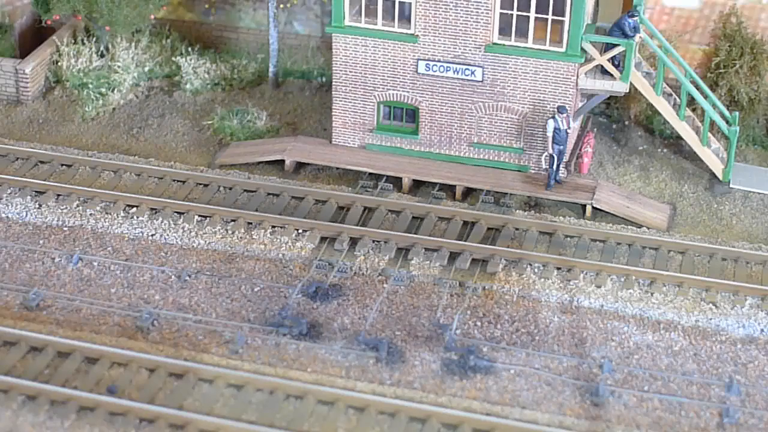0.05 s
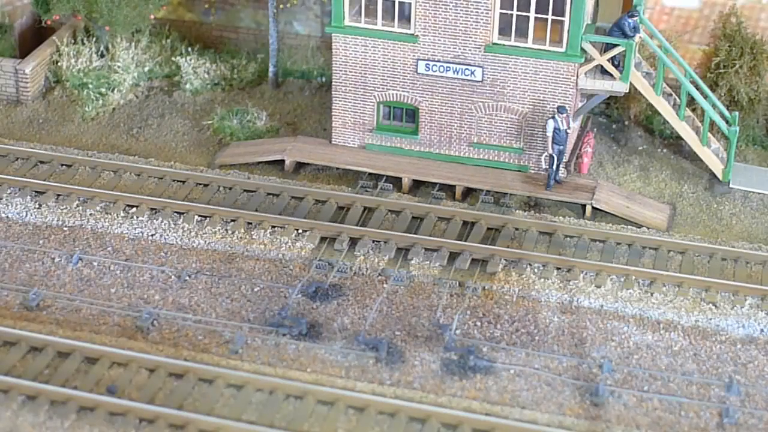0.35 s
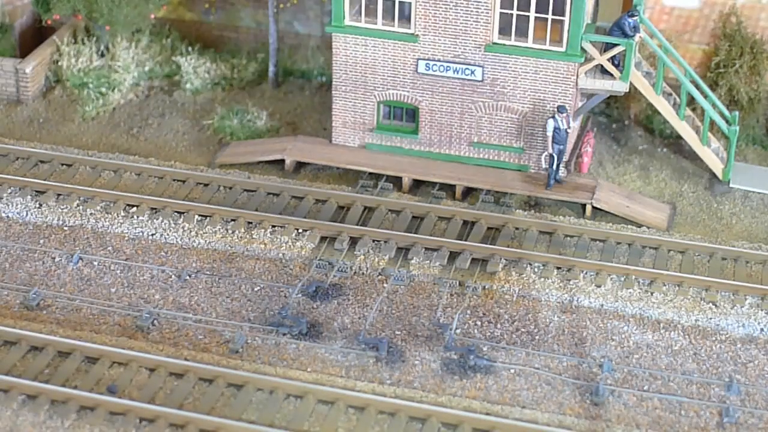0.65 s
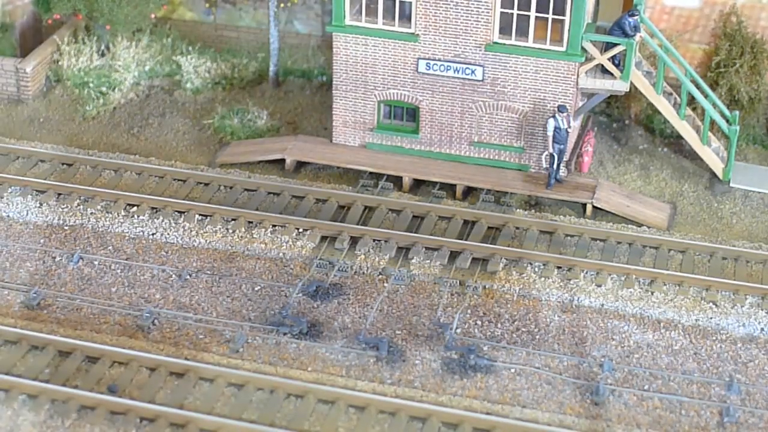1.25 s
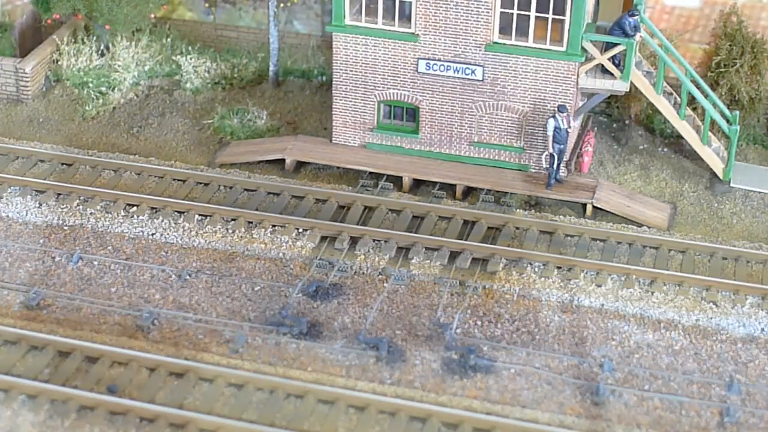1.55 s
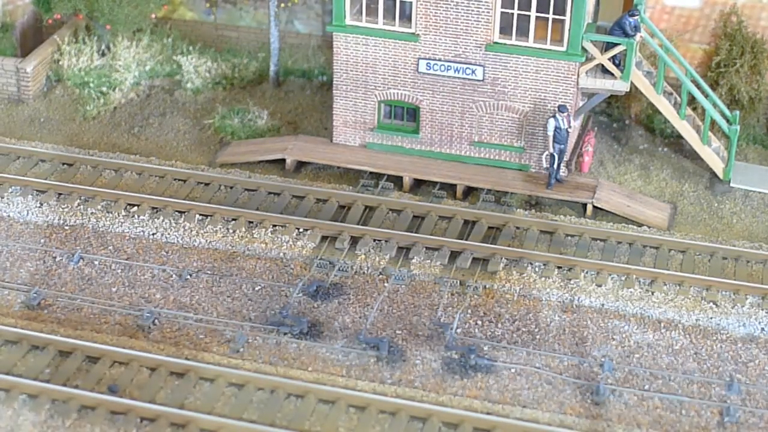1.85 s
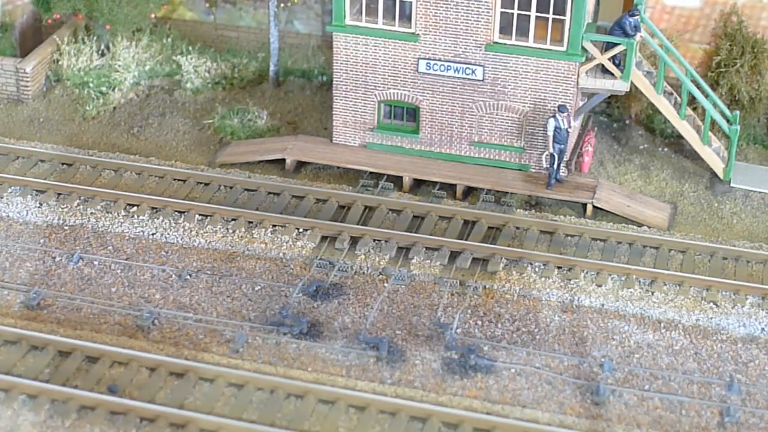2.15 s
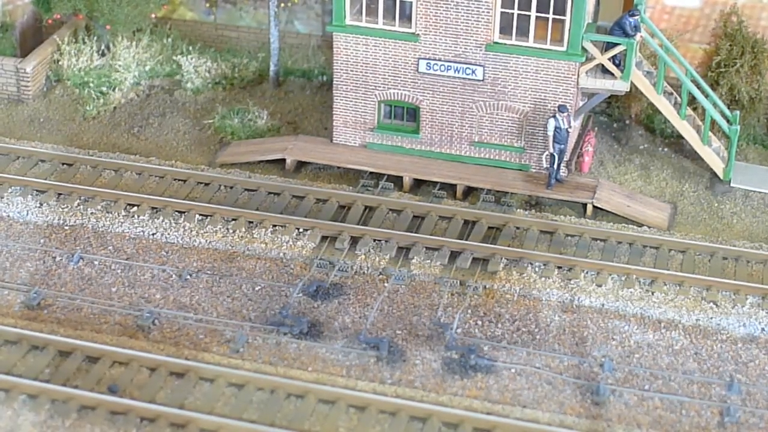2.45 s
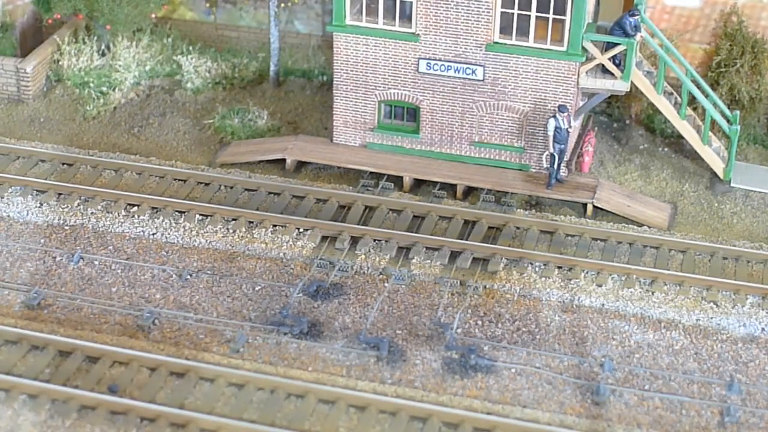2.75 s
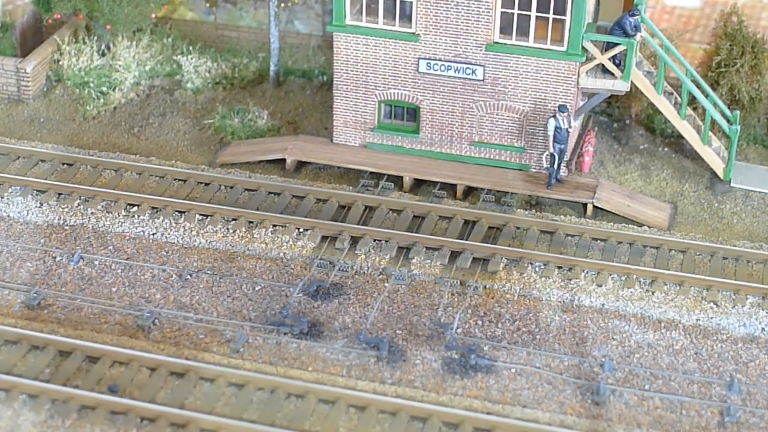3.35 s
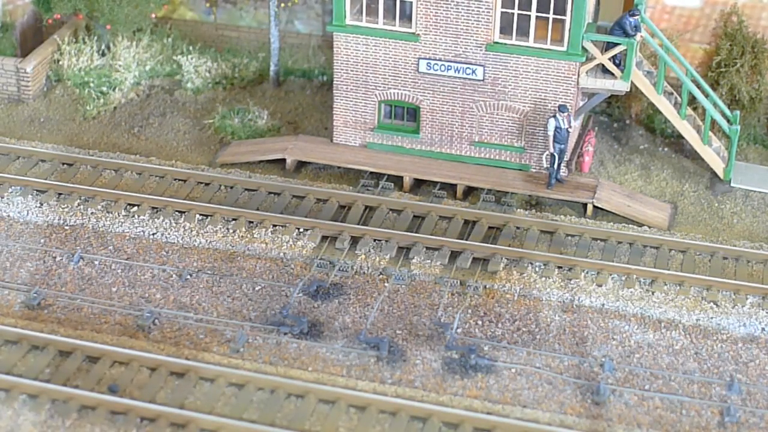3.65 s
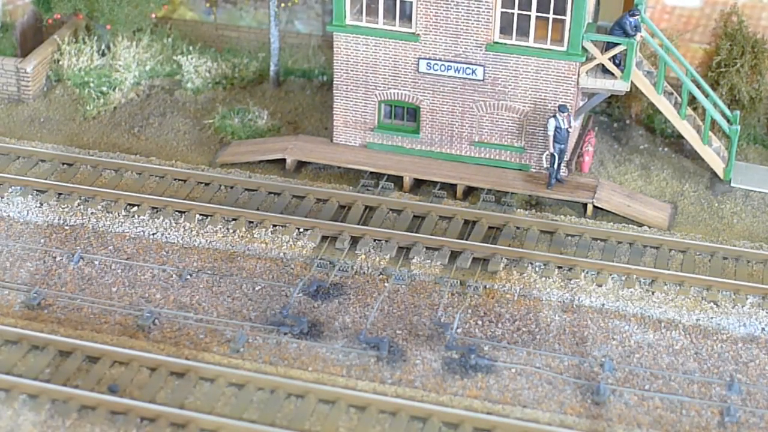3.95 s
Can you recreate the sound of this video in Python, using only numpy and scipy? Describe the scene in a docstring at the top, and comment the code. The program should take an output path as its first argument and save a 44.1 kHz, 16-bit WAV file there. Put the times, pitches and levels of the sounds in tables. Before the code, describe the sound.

A small electric motor whirrs and rattles steadily in a quiet room.

```python
"""A small electric motor, probably a model train out of sight, whirrs steadily in a quiet room.
Its gears and wheels rattle a light body that sings at a few pitches; one microphone hears the rattle
with a short room tail, over a low hum and faint rumble. The sound cuts in after a moment. Soft clicks,
tiny scrapes and low bumps follow in the first second; faint brushes and thuds come now and then."""
import sys
import numpy as np
from scipy import signal
from scipy.fft import rfft, irfft
from scipy.io import wavfile

SR = 44100
rng = np.random.default_rng(int(sys.argv[2]) if len(sys.argv) > 2 else 0)


def transcribe(u):
    """Save the signal u as a 16-bit wav file named by the first command-line argument.

    u: samples, shape (n,) or (channels, n), limited to [-1, 1]; the rate is SR.
    q: integer samples, one column per channel.
    """
    v = np.clip(np.atleast_2d(u).T, -1, 1)
    q = np.round(v * 32767).astype(np.int16)
    wavfile.write(sys.argv[1], SR, q)


N = 176400
T = np.arange(N) / SR

# how hard the mechanism rattles, before the trims: time_s, body_db, treble_db
RATTLE_DRIVE = [(0.31,-40.5,-42.5),(0.4,-39.5,-41),(0.69,-37.5,-41.5),(0.95,-39,-41),(1.35,-38,-39.5),(1.65,-38,-39.5),(1.97,-37.5,-39.5),(2.36,-36.5,-40),(2.76,-35.5,-40),(3.1,-35.5,-41),(3.6,-36.5,-39.5),(4.0,-36,-39.5)]
# colour of the rattle at the microphone: frequency_hz, relative_db
RATTLE_SPECTRUM = [(100,-33),(300,-22.5),(560,-25),(780,-20.5),(900,-14),(1040,-10),(1150,-2.5),(1320,-3.5),(1450,-8),(1650,-10),(1860,-7.5),(1990,-16),(2230,-12),(2370,-16.5),(2520,-14.5),(2650,-19.5),(2800,-10),(2950,-17),(3200,-18.5),(3370,-10),(3520,-17.5),(3750,-23.5),(4400,-23.5),(4900,-21),(5200,-27.5),(5700,-29.5),(6200,-28.5),(7250,-32.5),(7450,-43),(7600,-32),(8200,-30),(8800,-24),(9400,-32.5),(10100,-35.5),(10700,-38),(12300,-46.5),(14100,-50),(14850,-41),(15300,-48),(16000,-50)]
# where the body sings: pitch_hz, width_hz, level_db (relative to body_db)
BODY_MODES = [(939.7,8.6,-9.5),(1137,8.9,-10.5),(1196,14,-15.5),(1237,10,-19.5),(1286.3,3.9,-9),(1633,7,-15),(1684,7,-20),(1758,9.5,-14),(1885,4.4,-19),(2164,7,-23.5),(2193,9.6,-20),(2272,6,-21),(2740,7,-25),(2820,19,-22),(3310,16,-20)]
# swell shared by the lowest body mode and the shaft tone: time_s, gain_db
SINGING_SWELL = [(0.3,0.5),(1.3,-7),(1.8,0),(2.15,-7),(2.5,-1),(2.8,6.5),(3.1,0.5),(3.4,-1.5),(4,-7.5)]
# soft clicks: start_s, scuff_db, ring_db
CLICK_EVENTS = [(.49,-41,-39.5),(.621,-47.5,-60),(.757,-47.5,-60),(.878,-49,-64)]
# colour of a click's scuff: frequency_hz, relative_db
SCUFF_SPECTRUM = [(80,-22),(160,-2),(300,-3.5),(480,3),(620,-2.5),(790,5),(1100,-19),(2500,-24),(5500,-15),(7500,-28),(15000,-42)]
# the hollow part that the clicks ring: pitch_hz, relative_db, t60_s
HOLLOW_MODES = [(627,3,0.24),(803,-10,.12)]
# low bumps: start_s, pitch_hz, level_db, t60_s
BUMP_EVENTS = [(0.296,174,-41.5,.45),(0.616,183,-50,0.27)]
# thin scrapes around the first click: start_s, level_db
SCRAPE_EVENTS = [(.482,-48),(.489,-50),(.501,-51)]
# faint brushes: peak_s, sigma_s, level_db
BRUSH_EVENTS = [(.485,.022,-53),(.565,.02,-58),(0.61,0.012,-55),(.69,0.035,-58),(.762,0.014,-53),(.795,0.0087,-55),(1.213,.004,-57),(1.34,.03,-62),(1.975,.012,-57)]
# colour of the brushes: frequency_hz, relative_db
BRUSH_SPECTRUM = [(800,-17),(3000,4),(6500,0),(10000,2),(12000,-4),(14000,-4),(16000,-11)]
# soft thuds: peak_s, sigma_s, level_db
THUD_EVENTS = [(.9,0.042,-50),(2.26,.03,-56),(2.603,.025,-50)]
# colour of the thuds: frequency_hz, relative_db
THUD_SPECTRUM = [(25,-20),(45,-2),(70,-5),(105,2),(150,-6),(260,-22),(600,-43)]
# room rumble at the microphone: time_s, level_db
RUMBLE_LEVELS = [(0.3,-55.5),(0.9,-56),(1.3,-60.5),(2,-54),(2.6,-55),(3.05,-51.5),(3.6,-54),(4,-59)]
# colour of the room rumble: frequency_hz, relative_db
RUMBLE_SPECTRUM = [(15,-32),(28,-25),(40,-1.5),(65,-5.5),(95,6),(130,1.5),(200,0.5),(280,-7.5),(400,-2.5),(600,-12.5),(1500,-24.5)]


def rattle(ticks_per_s=2000, tick_spread_db=2.5, rub_share=0.6, turn_hz=30.97, split_hz=1460):
    """Gears and wheels tick and rub, throbbing with each turn, coloured by the body and the room."""
    ticks = (rng.random(N) < ticks_per_s / SR) * rng.choice([-1, 1], N)
    ticks = ticks * amp(tick_spread_db * np.minimum(rng.exponential(1, N), 4))
    throb = 1 + 0.062 * drifting_tone(turn_hz, drift=0.026, rate_hz=1.62)
    contact = np.sqrt(1 - rub_share) * unit(ticks) + np.sqrt(rub_share) * noise()
    flutter = amp(-0.01 * wander(rate_hz=11))
    sound = colour(room(contact * throb * flutter), RATTLE_SPECTRUM)
    body = shape(sound, lambda f: 1 / (1 + (f / split_hz) ** 12))
    body_gain = amp(curve(RATTLE_DRIVE) - 2.04)  # each band has its own trim
    treble_gain = amp(curve(RATTLE_DRIVE, column=2) - 0.47)
    return unit(body) * body_gain + unit(sound - body) * treble_gain


def shaft(pitch_hz=307, level_db=-66):
    """The spinning shaft gives a faint tone that swells and sinks."""
    tone = unit(drifting_tone(pitch_hz, drift=0.00588, rate_hz=1.25))
    return tone * amp(level_db + curve(SINGING_SWELL))


def singing():
    """Narrow resonances of the light body, kept ringing by the rattle."""
    drive_db, swell_db = curve(RATTLE_DRIVE), curve(SINGING_SWELL)
    return sum(resonance(hz, width_hz) * amp(db + drive_db + swell_db * (k == 0))
               for k, (hz, width_hz, db) in enumerate(BODY_MODES))


def clicks(scuff_rise_s=0.0085, scuff_t60_s=0.25, ring_rise_s=0.0023):
    """Each soft click is a brief scuff that rings a hollow part."""
    out = np.zeros(N)
    for start, scuff_db, ring_db in CLICK_EVENTS:
        age = np.maximum(T - start, 0)
        lead_in = np.exp(np.minimum(T - start, 0) / scuff_rise_s)
        out += colour(noise(), SCUFF_SPECTRUM) * lead_in * amp(scuff_db - 60 * age / scuff_t60_s)
        for hz, db, t60 in HOLLOW_MODES:
            out += struck_tone(start, hz, ring_db + db, t60, ring_rise_s)
    return out


def bumps():
    """Dull low bumps that die away quickly."""
    return sum(struck_tone(*bump, rise_s=0.0024) for bump in BUMP_EVENTS)


def scrapes(t60_s=0.046):
    """Tiny bursts of friction in one high resonance."""
    envelope = sum(amp(db - 60 * np.maximum(T - start, 0) / t60_s) * (T > start)
                   for start, db in SCRAPE_EVENTS)
    return envelope * resonance(pitch_hz=6650, width_hz=260)


def brushes():
    """Short swells of thin hiss, as of something lightly brushed."""
    return noise_swells(BRUSH_EVENTS, BRUSH_SPECTRUM)


def thuds():
    """Soft, pitchless swells of low rumble."""
    return noise_swells(THUD_EVENTS, THUD_SPECTRUM)


def hum(pitch_hz=109.3, level_db=-55.5, flicker_db=2.1):
    """A low, slightly unsteady hum behind the motor."""
    tone = unit(drifting_tone(pitch_hz, drift=0.0056, rate_hz=2.2))
    return tone * amp(level_db + flicker_db * wander(rate_hz=12))


def rumble():
    """Room tone: a faint rumble that slowly rises and falls."""
    return amp(curve(RUMBLE_LEVELS)) * colour(noise(), RUMBLE_SPECTRUM)


def room(direct, t60_s=0.31, tail_db=-7):
    """The small room's tail reaches the microphone 3 ms behind the direct sound."""
    t = T[:SR // 2]
    tail = rng.standard_normal(len(t)) * amp(-60 * t / t60_s) * (t > .003)
    return direct + amp(tail_db) * signal.fftconvolve(direct, tail / np.linalg.norm(tail))[:N]


def drifting_tone(pitch_hz, drift, rate_hz):
    """A sine whose pitch wanders by the rms fraction drift."""
    return np.sin(2 * np.pi * np.cumsum(pitch_hz * (1 + drift * wander(rate_hz))) / SR)


def struck_tone(start_s, pitch_hz, level_db, t60_s, rise_s):
    """One mode that rises softly and rings down."""
    age = np.maximum(T - start_s, 0)
    envelope = amp(level_db - 60 * age / t60_s) * (1 - np.exp(-age / rise_s))
    return envelope * np.sin(2 * np.pi * pitch_hz * age)


def resonance(pitch_hz, width_hz):
    """Noise ringing in one narrow band, rms 1."""
    return unit(shape(noise(), lambda f: 1 / (1 + ((f - pitch_hz) / width_hz) ** 2)))


def noise_swells(events, spectrum):
    """Coloured noise in bell-shaped swells."""
    envelope = sum(amp(db) * np.exp(-.5 * ((T - peak) / sigma) ** 2) for peak, sigma, db in events)
    return envelope * colour(noise(), spectrum)


def noise():
    """White noise, rms 1."""
    return rng.standard_normal(N)


def wander(rate_hz):
    """Slow random drift, rms 1."""
    return unit(shape(noise(), lambda f: (f > 0) / (1 + (f / rate_hz) ** 4)))


def colour(x, spectrum):
    """Filters x through (Hz, dB) points, to rms 1."""
    hz, db = np.transpose(spectrum)
    return unit(shape(x, lambda f: amp(np.interp(np.log(f + 1), np.log(hz), db))))


def shape(x, gain):
    """Filters x by a gain given as a function of frequency."""
    return irfft(rfft(x) * gain(np.fft.rfftfreq(len(x), 1 / SR)), len(x))


def curve(rows, column=1):
    """One column of a time table, joined by straight lines."""
    rows = np.array(rows)
    return np.interp(T, rows[:, 0], rows[:, column])


def amp(db):
    """Decibels to gain."""
    return 10 ** (np.asarray(db) / 20)


def unit(x):
    """Scales to rms 1."""
    return x / np.sqrt(np.mean(x ** 2) + 1e-20)


def scene():
    """The motor, the small noises and the room tone at one microphone."""
    motor = rattle() + shaft() + singing()
    background = hum() + rumble()
    small_noises = clicks() + brushes() + bumps() + thuds() + scrapes()
    return (motor + small_noises + background)[None]


def record(dry, start_s=0.297, cutoff_hz=15750):
    """The microphone's signal cuts in over 1 ms and loses its highest treble."""
    opened = dry * np.clip((T - start_s) / .001, 0, 1)
    lowpass = signal.firwin(511, cutoff_hz, window=("kaiser", 9), fs=SR)
    return signal.oaconvolve(opened, lowpass[None], "same")


dry = scene()
out = record(dry)
transcribe(out)
```